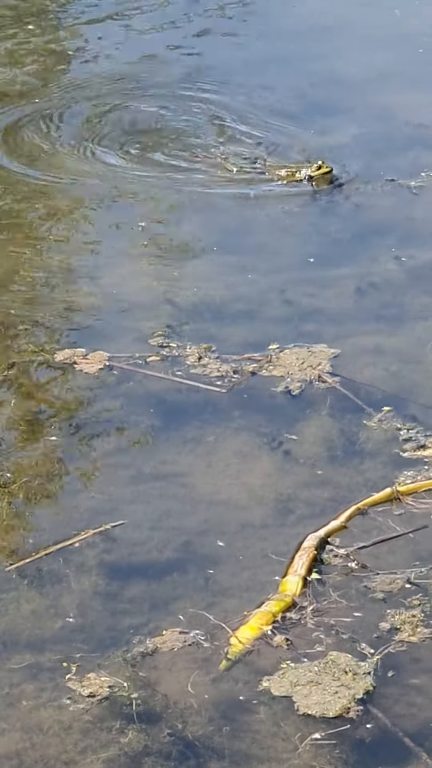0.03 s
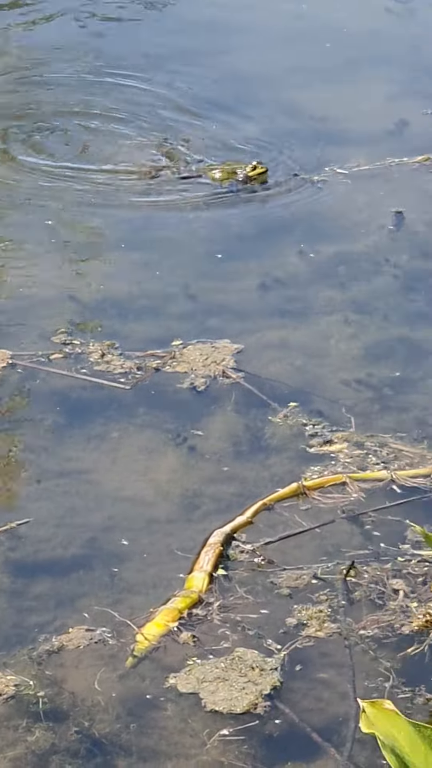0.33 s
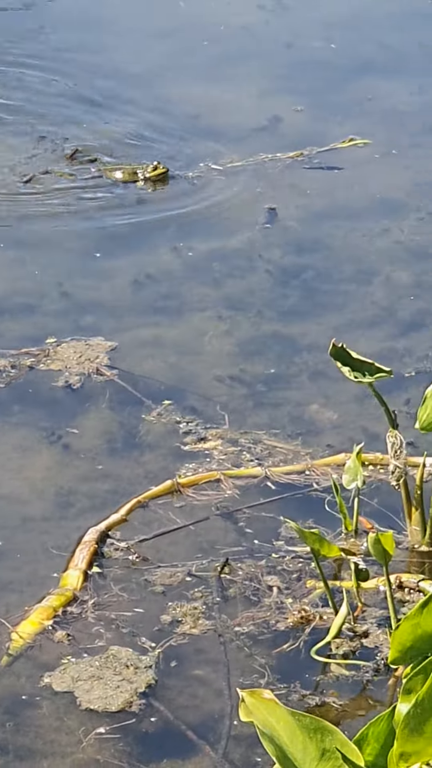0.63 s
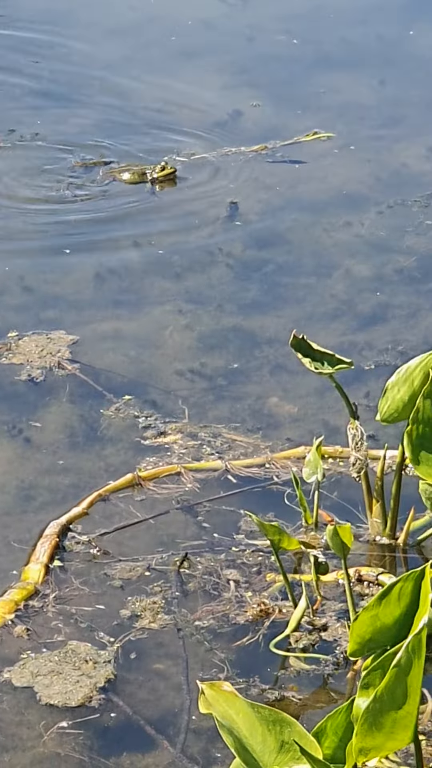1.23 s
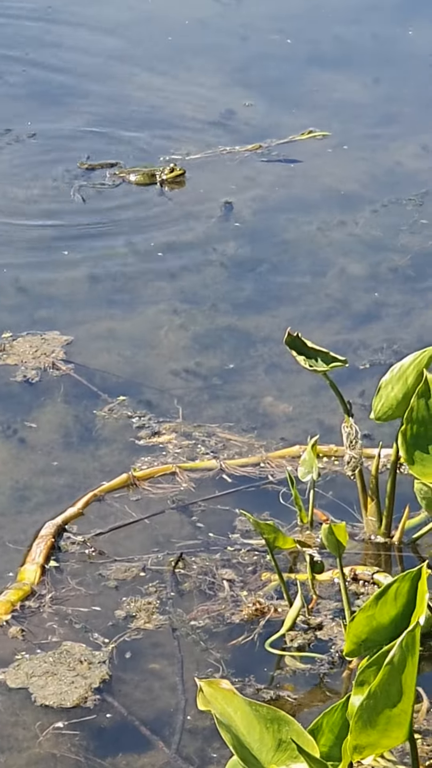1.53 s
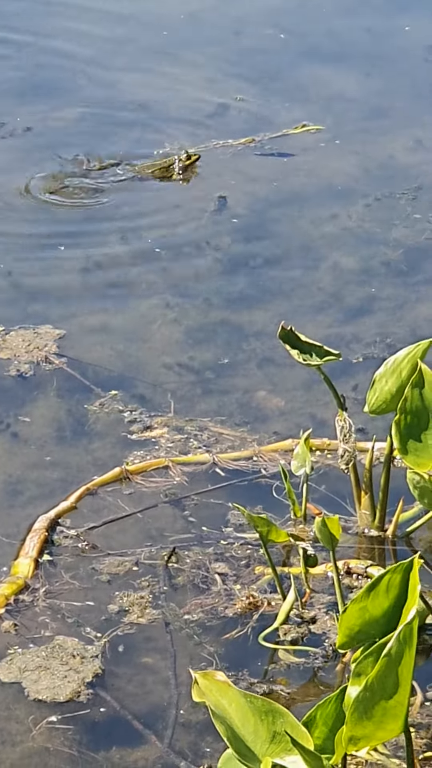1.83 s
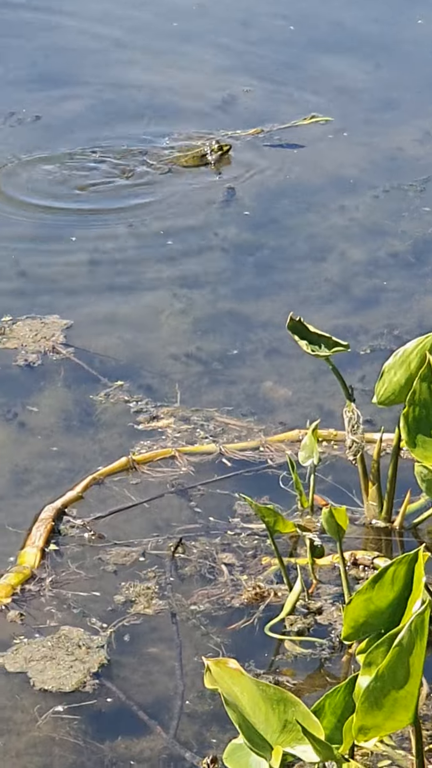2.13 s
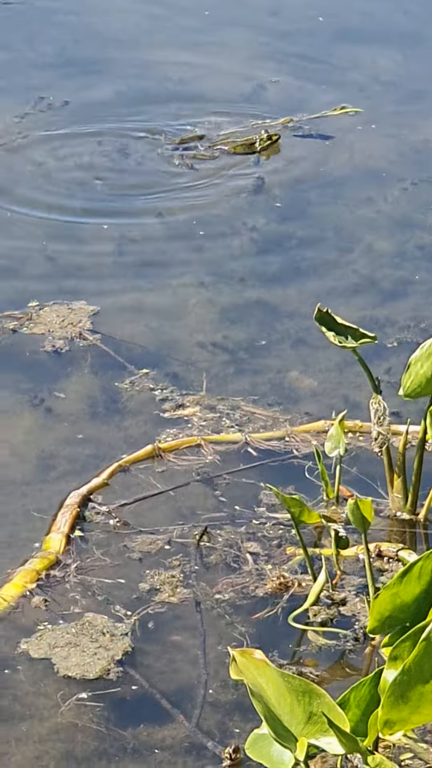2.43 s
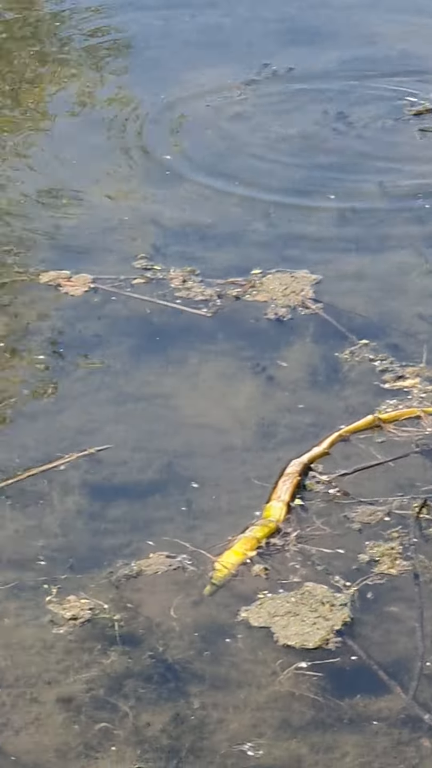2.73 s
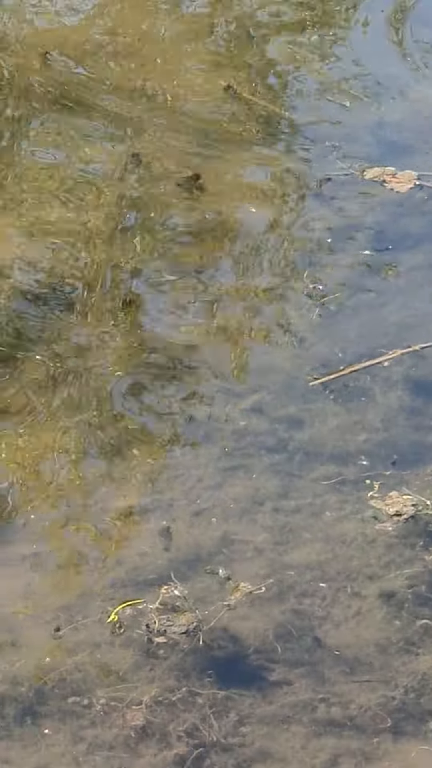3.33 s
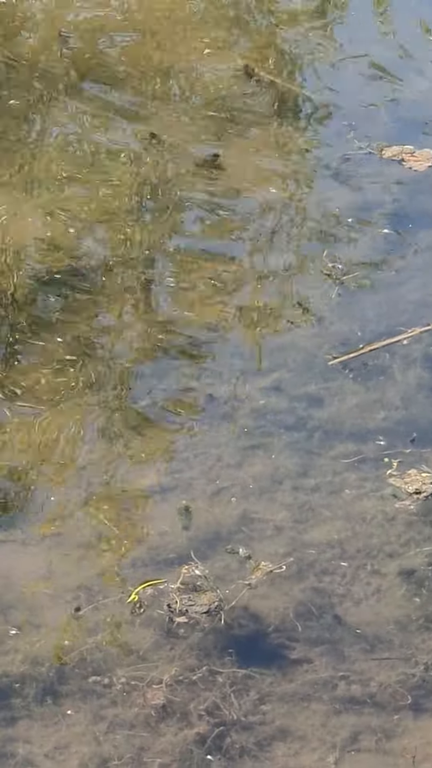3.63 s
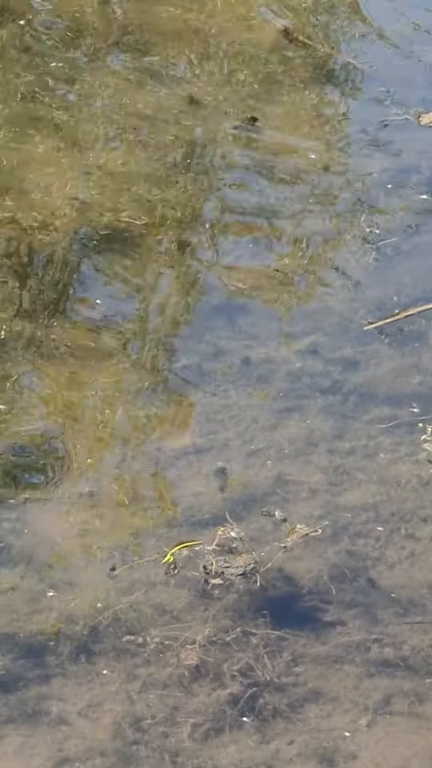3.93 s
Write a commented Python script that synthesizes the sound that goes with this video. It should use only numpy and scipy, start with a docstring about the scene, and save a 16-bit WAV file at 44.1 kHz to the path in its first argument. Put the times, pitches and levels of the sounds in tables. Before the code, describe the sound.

Close frogs croak in turn outdoors, with quieter grunts and light wind on the microphone.

```python
"""On a pond outdoors, three frogs croak in turn, two close by and one farther off.
Pulses from a frog's throat make its body ring at a few pitches, called resonances. A croak starts as
a thin clean whine and breaks into a loud rattle of uneven pulses, while its main resonance rises and
its upper one sinks. The banks echo, wind rumbles on the microphone, and behind it all lie a soft
outdoor wash and a faint hum."""
import sys
import numpy as np
from scipy import signal
from scipy.fft import rfft, irfft
from scipy.io import wavfile
from scipy.ndimage import uniform_filter1d

SR = 44100
rng = np.random.default_rng(int(sys.argv[2]) if len(sys.argv) > 2 else 0)


def wav_out(sig):
    """Save sig, one row per channel (or a flat mono array), as 16-bit PCM at SR to the path in sys.argv[1]."""
    wavfile.write(sys.argv[1], SR, np.round(np.clip(np.atleast_2d(sig).T, -1, 1) * 32767).astype(np.int16))


N = 176400
TIME = np.arange(N) / SR
HZ = np.fft.rfftfreq(N, 1 / SR)


# One list per croak. Each row: time in seconds, pulses per second, roughness (0 is clean, 1 or more
# rattles), main resonance in Hz, upper resonance in Hz, level in dB.
WHINER_CROAKS = [
    [(.85, 534, .08, 1020, 4930, -41), (.89, 481, 0.3, 1018, 4800, -32), (.93, 570, .1, 965, 5100, -34.5),
     (.955, 396, 0.6, 885, 5040, -26), (.985, 366, 0.3, 932, 4300, -22.5),
     (1.012, 198, 0.8, 1197, 3760, -16.5), (1.038, 255, 1.2, 1190, 3610, -20),
     (1.064, 220, 1.2, 1360, 3550, -35.5)],
    [(2.46, 450, 0.3, 1248, 4403, -43.5), (2.518, 433, 0.2, 1248, 3886, -24.5),
     (2.533, 436, .08, 1184, 4040, -28), (2.578, 370, .3, 898, 4700, -25.5),
     (2.612, 331, 0.5, 1068, 4020, -16.5), (2.662, 274, .9, 1317, 3470, -15),
     (2.682, 157, 1.5, 1240, 3350, -32.5)],
    [(3.175, 494, .05, 923, 4640, -39.5), (3.202, 425, .05, 1180, 4460, -38),
     (3.262, 449, .05, 1282, 3920, -25.5), (3.285, 443, .35, 1263, 4060, -21),
     (3.32, 350, .7, 1009, 4210, -24), (3.368, 294, 0.78, 1233, 3770, -16),
     (3.396, 239, 1, 1247, 3590, -15), (3.426, 132, 0.9, 1324, 3460, -40)],
]
RASPER_CROAKS = [
    [(.11, 372.2, 0.23, 1015, 3700, -45.5), (.143, 408.8, 0.034, 1123, 3340, -29),
     (.18, 370.7, 0.61, 1126, 3320, -27.5), (.195, 321.3, 0.3, 1244, 3020, -24),
     (.256, 327.3, 0.89, 1347, 3560, -21), (.295, 215.3, 0.61, 1610, 3160, -41.5)],
    [(1.9, 304.7, 0.79, 860, 4660, -43), (1.923, 393.1, .1, 1150, 4770, -37),
     (1.975, 378.8, 0.31, 1420, 3500, -29), (2.007, 316.8, 0.22, 1258, 3790, -22),
     (2.056, 293.9, 0.74, 1476, 3470, -20.5), (2.07, 169.5, 0.81, 1504, 3370, -32.5),
     (2.1, 171, 0.96, 1470, 3306, -29.5)],
    [(3.898, 391.2, 1, 740, 4600, -37.5), (3.935, 368, 0.65, 1190, 4560, -32.5),
     (3.975, 302.6, 0.96, 1397, 3770, -27.5), (4.01, 295.5, 0.49, 1553, 3530, -20)],
]
# How each frog's body colours its voice. Each row: frequency in Hz, boost or cut in dB.
WHINER_COLOUR = [(170, -19.5), (385, 12.5), (500, 6), (1000, 0.5), (1500, -3), (1820, 0.5), (2030, -14),
                 (2280, -6), (3200, -9), (4700, -32), (5500, -23.5), (7000, -50), (8700, -31),
                 (15000, -49.5)]
RASPER_COLOUR = [(170, -29.5), (380, 27), (490, 14.5), (1550, 2), (1950, -4.5), (2300, 0), (2780, -12.5),
                 (3080, 8.5), (3400, -19), (4300, -19.5), (9000, -53.5)]
# Each row: frequency in Hz, how far the right side lags in radians.
NEAR_LAG = [(400, 0), (950, 0.4), (1300, 0.23), (1600, 1.08), (3000, 0.8)]
# Each row: frequency in Hz, how much louder the left side is in dB.
NEAR_LEFT_DB = [(420, -1.5), (690, 4.5), (1050, -3.5), (1850, 0.5)]

def near_frogs():
    """Two close frogs take turns, one whining and one rasping."""
    whiner = frog(WHINER_CROAKS, WHINER_COLOUR, NEAR_LAG, NEAR_LEFT_DB,
                  main_width_hz=111, upper_width_hz=386, upper_db=-26.5, low_db=-9)
    rasper = frog(RASPER_CROAKS, RASPER_COLOUR, NEAR_LAG, NEAR_LEFT_DB,
                  main_width_hz=174, upper_width_hz=327, upper_db=-16.5, low_db=-7)
    return whiner + rasper


def frog(shapes, body, lag, balance, **voice):
    """All croaks in one frog voice, placed between the two microphones."""
    out = np.zeros(N + SR // 10)
    for shape in shapes:
        add(out, *croak(shape, body, **voice))
    hz = np.fft.rfftfreq(len(out), 1 / SR)
    left = amp(read(balance, hz) / 2) * np.exp(.5j * read(lag, hz))
    return irfft(rfft(out) * np.array([left, 1 / left]), len(out))[:, :N]


def croak(shape, body, main_width_hz, upper_width_hz, upper_db, low_db):
    """Throat pulses ring the frog's body and its moving resonances. Gives start time and sound."""
    t = np.arange(shape[0][0], shape[-1][0], 1 / SR)
    rate, rough, main_hz, upper_hz, level_db = follow(shape, t)
    rough = np.clip(rough, .05, 1)
    pulses = throat(t, rate, rough)
    main = colour(resonate(pulses, main_hz, main_width_hz), body)
    treble = high_ring(pulses, rough, upper_hz, upper_width_hz, upper_db)
    low = resonate(pulses * np.sqrt(rough), hz=400, width_hz=55)
    low = resonate(low, hz=400, width_hz=110)
    return t[0], swell(main + treble + amp(low_db) * low, t, level_db)


def throat(t, rate, rough, count=200, jitter=.21, uneven_db=4.5, hiss=.42):
    """Pulses that turn from regular to uneven with roughness, each with a puff of hiss."""
    gap, strength = np.clip(rng.standard_normal((count, 2)), -2, 2).T
    cycles = np.cumsum(rate * (1 + .01 * drift(65)[:len(t)])) / SR
    pulse_rough = np.interp(np.arange(count), cycles, rough)
    spacing = np.exp(jitter * pulse_rough * gap)
    place = np.interp(np.cumsum(spacing), cycles, np.arange(len(t)))
    sizes = amp(uneven_db * pulse_rough * strength)
    inside = place < len(t) - 1
    pulses = np.zeros(len(t))
    for at, size in zip(place[inside], sizes[inside]):
        pulses[int(at):int(at) + 2] += size * np.array([1 - at % 1, at % 1])  # shared by two samples
    tails = signal.lfilter([1], [1, -np.exp(-1 / (.0036 * SR))], pulses)
    puffs = tails * rng.standard_normal(N)[:len(t)]
    return evened(pulses) + hiss * rough * evened(puffs)


def high_ring(pulses, rough, upper_hz, width_hz, upper_db):
    """The upper resonance flutters; a weaker one below it and a bright whine fade with roughness."""
    upper = middle = whine = pulses
    flutter_hz = upper_hz * (1 + .012 * drift(90)[:len(pulses)])
    for _ in range(3):
        upper = resonate(upper, flutter_hz, width_hz)
        middle = resonate(middle, .745 * upper_hz, width_hz)
        whine = resonate(whine, hz=2700, width_hz=755)
    flicker = amp(3 * drift(110)[:len(pulses)])
    upper = upper * flicker * np.exp(-np.maximum(upper_hz - 4090, 0) / 630)  # weaker above 4090 Hz
    middle = amp(-1.5) * middle * (1 - rough ** 2)
    whine = amp(-22) * whine * (1 - rough) ** 2
    return amp(upper_db) * (upper + middle) + whine


# Each entry: time in seconds at which the level, after a brief dip, comes back with a burst.
STALL_ENDS = [0.188, 1.005, 1.419, 1.998, 2.037, 2.6, 2.656, 3.386]

def swell(voice, t, level_db, stall_s=.0089, stall_db=-8):
    """Evens out the voice, then makes it rise and fall with the croak and dip at each stall."""
    window = np.hanning(round(.018 * SR))
    power = signal.fftconvolve(voice ** 2, window, "same")
    power /= signal.fftconvolve(np.ones(len(t)), window, "same")
    steady = voice / np.sqrt(abs(power) + 1e-12)
    fades = np.clip(np.minimum((t - t[0]) / .012, (t[-1] - t) / .008), 0, 1)
    dips = sum(np.exp(-((t - s) / stall_s) ** 2) * (t < s) for s in STALL_ENDS)
    return steady * amp(level_db + stall_db * uniform_filter1d(dips, size=40)) * fades


# Single hard pulses that stand out as a croak runs down.
# Each row: start in seconds, pitch in Hz, seconds to fade by 60 dB, level in dB.
HARD_PULSES = [(1.4306, 1220, 0.0073, -16), (1.4367, 1700, .005, -13.5), (1.452, 1734, 0.007, -22),
               (2.6822, 1322, 0.03, -12)]

def hard_pulses(upper_hz=3430, upper_db=-24.5):
    """Each lone pulse lets the main and upper resonances ring out."""
    out, t = np.zeros(N), TIME[:SR // 10]
    attack = 1 - np.exp(-(t / .0007) ** 2)
    for start, hz, fade_s, level_db in HARD_PULSES:
        ring = np.sin(2 * np.pi * hz * t) + amp(upper_db) * np.sin(2 * np.pi * upper_hz * t)
        add(out, start, ring * amp(level_db - 60 * t / fade_s) * attack)
    return out


# Each row: start in seconds, length in seconds, top level in dB, base resonance in Hz.
SHORT_GRUNTS = [(0.266, .11, -25, 995), (1.366, .108, -30, 997), (2.302, 0.13, -40, 1290),
                (2.412, 0.12, -33.5, 1050), (2.846, .09, -39, 830), (2.924, 0.12, -35, 1088)]
# The shape of every grunt. Each row: share of the length, pulses per second, roughness, main resonance
# as a multiple of the base, upper resonance in Hz, dB compared with the top level.
GRUNT_SHAPE = [(0, 450, 0.47, 0.68, 5100, -4.5), (0.3, 360, 0.56, 1.03, 4600, -2),
               (0.618, 240, 1, 1.055, 4400, 0), (0.998, 200, 0.84, 1.1, 4020, -14)]
# Each row: frequency in Hz, the body's boost or cut in dB.
GRUNT_COLOUR = [(150, -9.5), (390, 17.5), (900, 4.5), (2200, -4), (2700, -11), (4000, -11), (9000, -52)]
# Each row: frequency in Hz, how far the right side lags in radians.
GRUNT_LAG = [(1400, 0.4), (4000, -1.4)]
# Each row: frequency in Hz, how much louder the left side is in dB.
GRUNT_LEFT_DB = [(1000, 0.5)]

def grunts():
    """Short, quiet frog grunts of one shape; the two near 2.3-2.5 s lead into the whining croak."""
    shapes = []
    for start, length, top_db, base_hz in SHORT_GRUNTS:
        shapes.append([(start + share * length, rate, rough, base_hz * ratio, upper_hz, top_db + db)
                       for share, rate, rough, ratio, upper_hz, db in GRUNT_SHAPE])
    return frog(shapes, GRUNT_COLOUR, GRUNT_LAG, GRUNT_LEFT_DB,
                main_width_hz=154, upper_width_hz=220, upper_db=-24, low_db=-17)


def echoes(x, fade_s, level_db, dull_hz, per_second=2000):
    """A thin, dull scatter of echoes from the banks, plants or ground."""
    t = TIME[:SR]
    bounces = rng.standard_normal((2, SR)) * (rng.random((2, SR)) < per_second / SR)
    bounces *= amp(-60 * t / fade_s) * (t > .004)
    bounces /= np.linalg.norm(bounces, axis=1, keepdims=True)
    echoed = signal.fftconvolve(x, bounces, axes=1)[:, :N]
    return amp(level_db) * signal.sosfilt(signal.butter(2, dull_hz, fs=SR, output="sos"), echoed)


# Each row: time in seconds, wind level in dB before gain_db is added.
WIND_LEVELS = [(.07, -43), (.25, -35), (.45, -47.5), (.69, -37), (.77, -51), (1.1, -42.5), (1.6, -45),
               (1.76, -52.5), (2.12, -45), (2.65, -42), (3.12, -46), (3.33, -42), (3.55, -54.5),
               (3.85, -35.5)]
# Each row: frequency in Hz, boost or cut of the rumble in dB.
WIND_COLOUR = [(20, -14.5), (70, 2), (160, -10), (400, -30.5), (3000, -108)]
# Each row: middle of a thump in seconds, pitch in Hz, strength as a plain multiplier.
WIND_THUMPS = [(0.269, 90, 0.088)]

def wind(gain_db, lumps_db, likeness=.05):
    """Wind hits each microphone with a lumpy rumble of its own, and both with one thump."""
    spectrum = amp(read(WIND_COLOUR, HZ))
    left, other = [evened(irfft(rfft(rng.standard_normal(N)) * spectrum, N)) for side in "LR"]
    rumble = evened(stereo(left, other, likeness) * amp(lumps_db * drift(6.6)))
    out = rumble * amp(gain_db + follow(WIND_LEVELS, TIME)[0])
    for middle, hz, strength in WIND_THUMPS:
        cycles = (TIME - middle) * hz
        thump = strength * np.sin(2 * np.pi * cycles) * np.exp(-2 * cycles ** 2)
        out -= thump * np.array([[.7], [1.3]])  # stronger on the right
    return out


# Each row: frequency in Hz, boost or cut of the wash in dB.
WASH_COLOUR = [(200, 0.5), (1120, -1), (1500, -15.5), (2200, -23), (3400, -24.5), (6900, -35),
               (7900, -47.5), (15500, -47.5)]
# Each row: frequency in Hz, how alike left and right are from 0 to 1.
WASH_LIKENESS = [(1200, 0.88), (8000, 0.077)]

def wash(level_db, patchy_db, size=1024):
    """Distant outdoor noise with drifting louder and softer patches."""
    hop, hz = size // 4, np.fft.rfftfreq(size, 1 / SR)[:, None]
    a, b, c, d, patches = rng.standard_normal((N // hop + 5, len(hz), 5)).T
    patches = uniform_filter1d(patches, size=5, axis=0)  # smooth across pitch
    patches = evened(uniform_filter1d(patches, size=20, axis=1))  # and across time
    spectra = stereo(a + 1j * b, c + 1j * d, read(WASH_LIKENESS, hz))
    spectra *= amp(read(WASH_COLOUR, hz) + patchy_db * patches / (1 + hz / 4000))
    _, noise = signal.istft(spectra, nperseg=size, noverlap=size - hop)
    return amp(level_db) * evened(noise[:, :N])


# Each row: time in seconds, hum level in dB before gain_db is added.
HUM_LEVELS = [(0, -52), (1.4, -53), (1.85, -59.5), (2.2, -45), (2.95, -49), (3.4, -58.5)]

def hum(gain_db, hz, width_hz):
    """A faint, wavering low hum: noise narrowed down to one pitch."""
    tone = resonate(resonate(rng.standard_normal(N), hz, width_hz), hz, width_hz)
    return evened(tone) * amp(gain_db + follow(HUM_LEVELS, TIME)[0])


def amp(db):
    """Turns decibels into a multiplier."""
    return 10 ** (np.asarray(db) / 20)


def evened(x):
    """Scales a signal to an average power of 1."""
    return x / np.sqrt(np.mean(x ** 2) + 1e-20)


def read(points, hz):
    """Reads a table at the frequencies hz, spacing octaves evenly."""
    f, value = np.transpose(points)
    return np.interp(np.log(hz + 1), np.log(f + 1), value)


def follow(rows, t):
    """Reads every column of a table at the times t."""
    s, *columns = np.transpose(rows)
    return [np.interp(t, s, c) for c in columns]


def add(mix, start, sound):
    """Mixes a sound in at a start time in seconds."""
    part = mix[max(round(start * SR), 0):][:len(sound)]
    part += sound[:len(part)]


def stereo(left, other, likeness):
    """Makes two noises into a pair whose right side partly copies the left."""
    return np.array([left, likeness * left + np.sqrt(1 - likeness ** 2) * other])


def drift(rate_hz):
    """Smooth random wandering, about 1 in size."""
    return evened(irfft(rfft(rng.standard_normal(N)) / (1 + (HZ / rate_hz) ** 4), N))


def resonate(x, hz, width_hz):
    """Makes x ring at a fixed or moving pitch; a narrower width rings longer."""
    turn = np.exp(2j * np.pi * np.cumsum(hz * np.ones(len(x))) / SR)
    decay = np.exp(-np.pi * width_hz / SR)
    return 2 * (turn * signal.lfilter([1 - decay], [1, -decay], x / turn + 1e-18)).real


def colour(x, points, size=4096):
    """Boosts and cuts frequencies by a table, ringing only after each pulse."""
    log_gain = np.log(amp(read(points, abs(np.fft.fftfreq(size, 1 / SR)))))
    taps = np.fft.ifft(np.exp(np.conj(signal.hilbert(log_gain)))).real
    return signal.fftconvolve(x, taps[:size // 2])[:len(x)]


def scene():
    """The frogs, their echoes, wind and background."""
    croaks_and_hard_pulses = near_frogs() + hard_pulses()
    frogs = croaks_and_hard_pulses + grunts()
    banks = echoes(croaks_and_hard_pulses, fade_s=.31, level_db=-19, dull_hz=4000)
    ground = echoes(frogs, fade_s=.047, level_db=-14, dull_hz=4440)
    rumble = wind(gain_db=6.5, lumps_db=2.5)
    background = wash(level_db=-45, patchy_db=3.5) + hum(gain_db=.5, hz=233.8, width_hz=18)
    return frogs + banks + ground + rumble + background


def record(dry):
    """A very short fade at the end, then the recorder cuts the treble above 15700 Hz."""
    fade = np.sin(np.pi / 2 * np.minimum((TIME[-1] - TIME) / .002, 1)) ** 2
    treble_cut = signal.firwin(511, 15700, window=("kaiser", 9), fs=SR)
    return signal.oaconvolve(dry * fade, treble_cut[None], "same")


dry = scene()
out = record(dry)
wav_out(out)
```